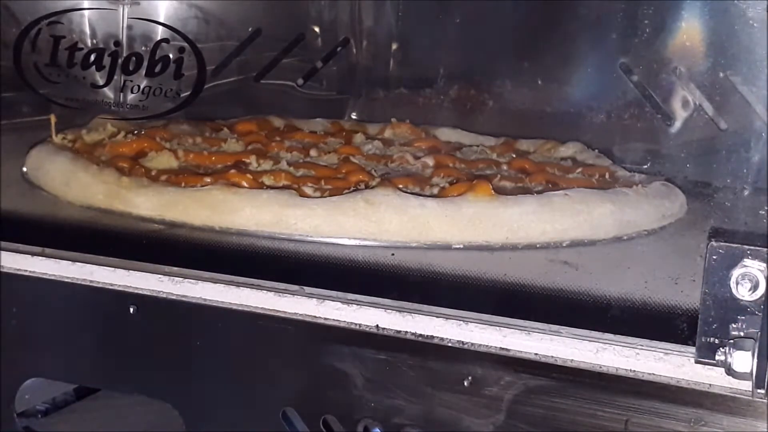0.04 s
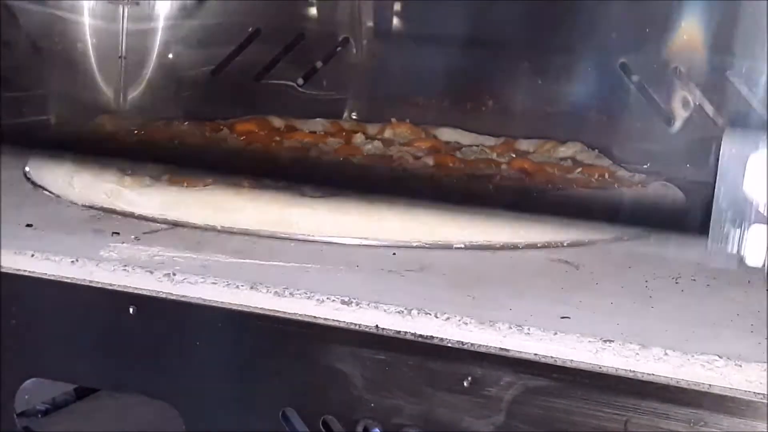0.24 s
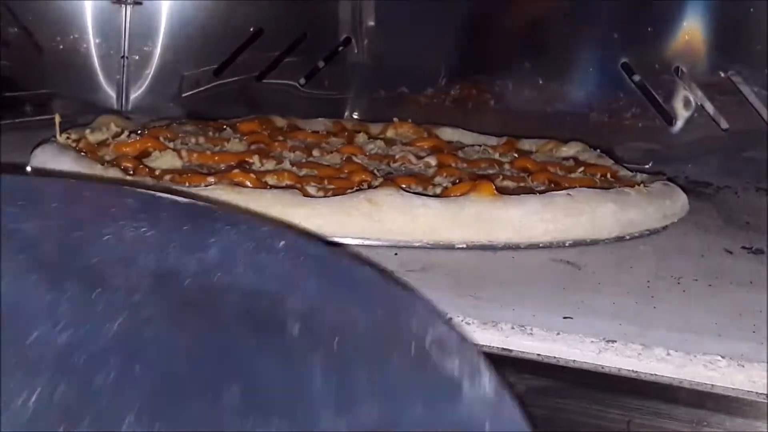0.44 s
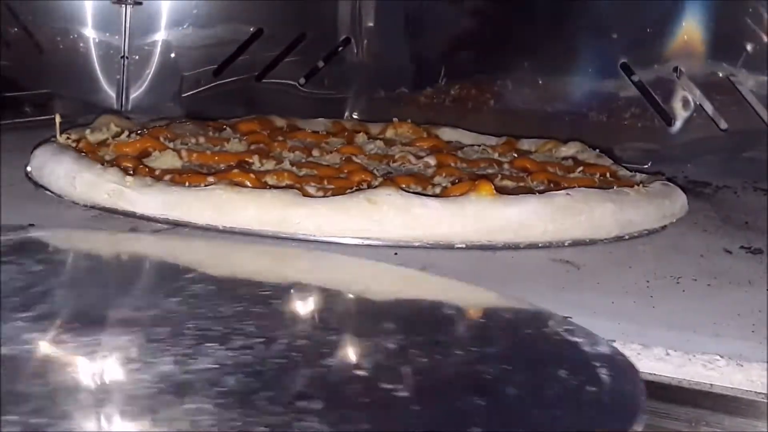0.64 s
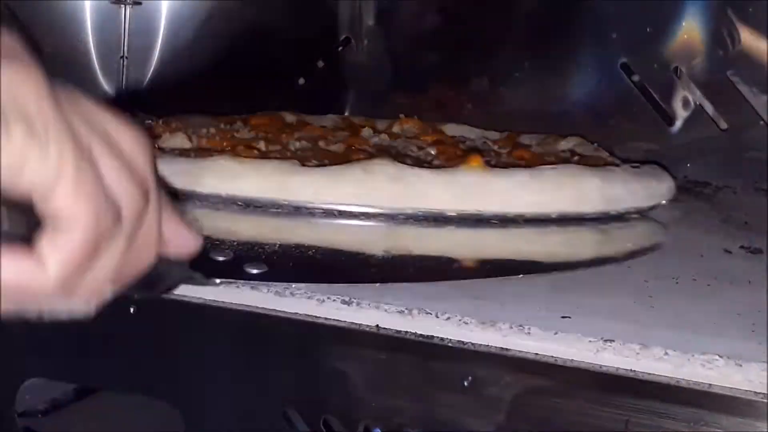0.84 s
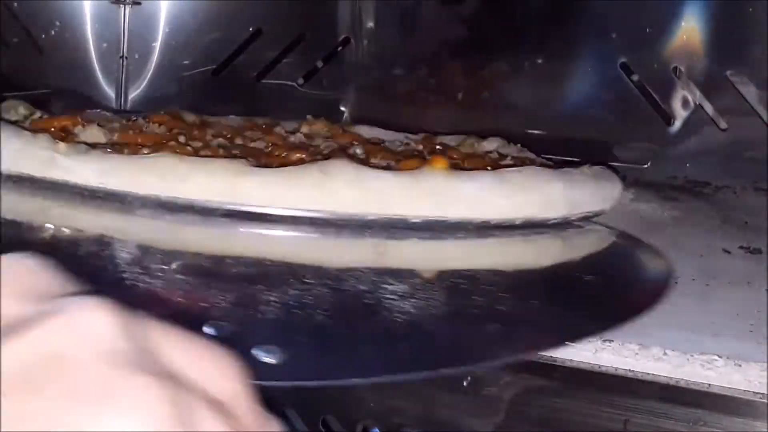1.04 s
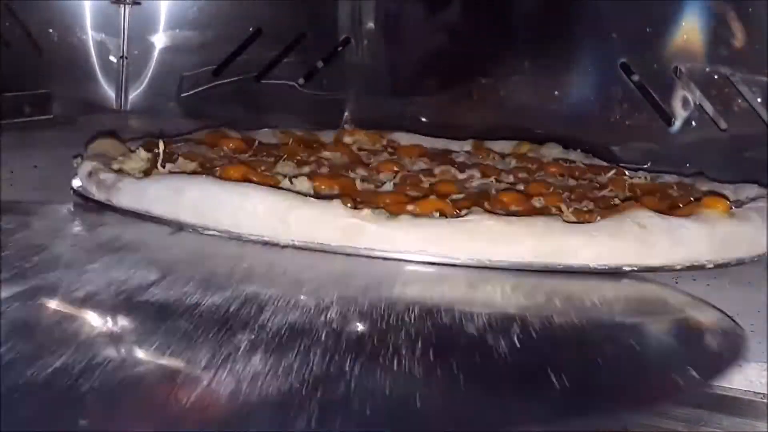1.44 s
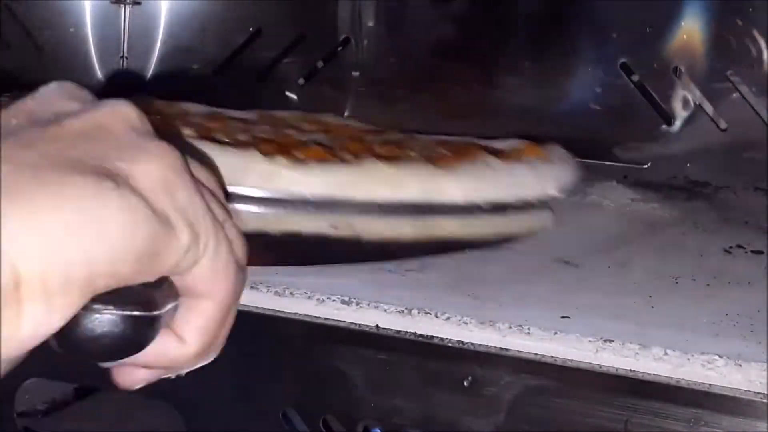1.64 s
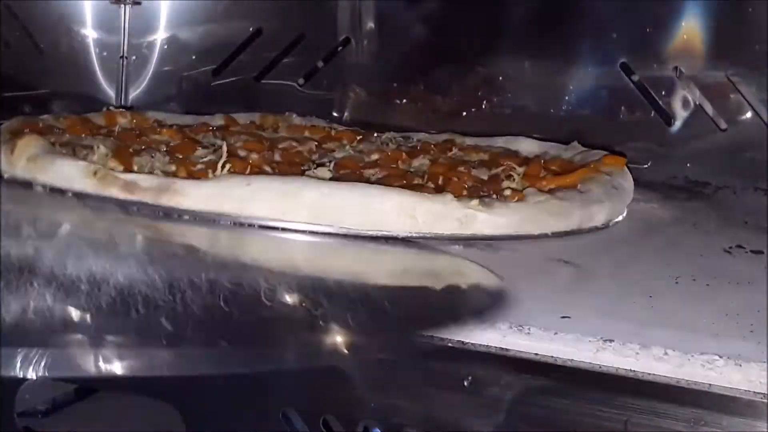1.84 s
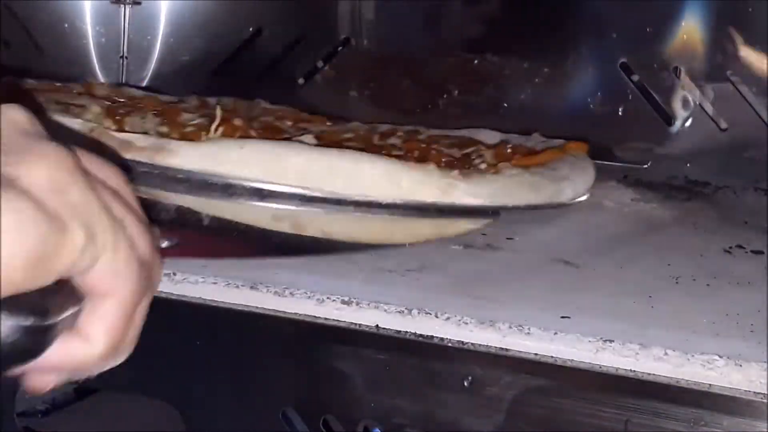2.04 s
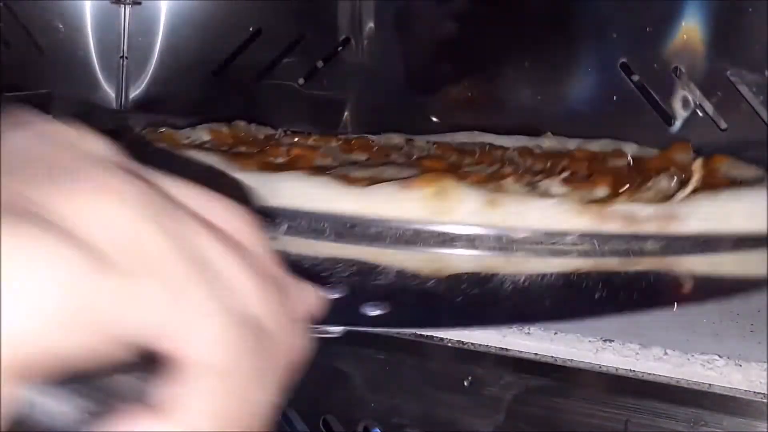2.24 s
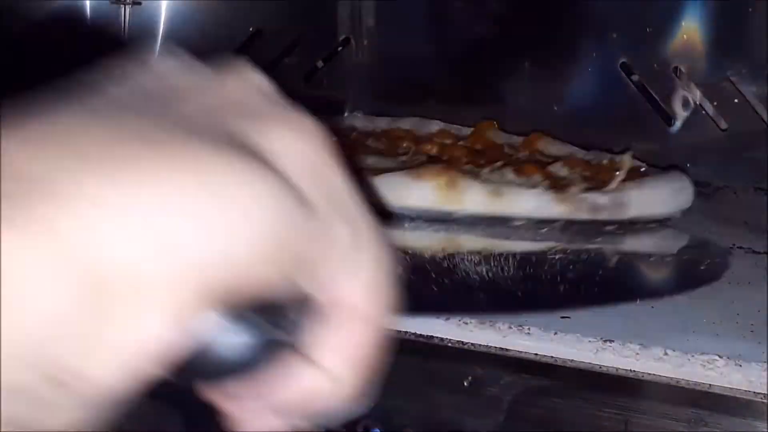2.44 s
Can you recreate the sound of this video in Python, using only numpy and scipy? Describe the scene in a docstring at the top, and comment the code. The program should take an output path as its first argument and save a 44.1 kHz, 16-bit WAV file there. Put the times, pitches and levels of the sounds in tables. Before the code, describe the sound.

Metal scraping and clanking as an oven door opens and a pizza peel slides over stone.

```python
"""At a gas pizza oven, the steel door grinds open on its hinge and clanks against its stop.
A metal peel slides in under the pizza, turns it in short scraping strokes over the stone floor
and knocks down on the stone. Impacts excite the modes of the sheet metal; stick-slip friction
makes it scrape and squeak. Everything reverberates in the steel oven chamber,
over the soft hiss of the burner."""
import sys
import numpy as np
from scipy import signal
from scipy.fft import rfft, irfft
from scipy.io import wavfile

SR = 44100
rng = np.random.default_rng(int(sys.argv[2]) if len(sys.argv) > 2 else 0)


def wav_record(signal):
    """Record a signal, one row per channel, as 16-bit PCM in the file named by sys.argv[1]."""
    frames = np.transpose(np.atleast_2d(signal))
    bounded = np.clip(frames, -1, 1)
    # unit amplitude maps onto the largest positive 16-bit level
    quanta = np.round(bounded * 32767).astype(np.int16)
    wavfile.write(sys.argv[1], SR, quanta)


N = 110250
T = np.arange(N) / SR


def door():
    """Friction and impact excite a steel plate: the door grinds on its hinge and clanks."""
    # clanks: t/s, attack/s, t60/s, bass, middle, treble and ring level/dB, f/Hz that rings most
    clanks = [(.074, 0.0098, 0.12, -79, -61, -48.5, -59.5, 2000),
              (.201, 0.00086, 0.15, -40, -53, -54, -45, 2000),
              (.227, 0.00047, 0.17, -40.5, -35, -26, -38.5, 1550),
              (.243, 0.0014, 0.24, -36, -32.5, -34, -41, 1220),
              (.277, 0.0013, 0.3, -41, -41.5, -54, -50, 1700),
              (.399, 0.0042, 0.17, -33.5, -39, -32, -28, 1150),
              (.403, 0.00041, 0.029, -34, -49, -26, -30.5, 4850),
              (.410, 0.00082, 0.23, -43, -38, -51, -24.5, 607),
              (.556, 0.0034, 0.12, -36, -39.5, -31.5, -34, 1045),
              (.568, .002, .08, -33, -66, -41.5, -27, 980), (.591, 0.00073, 0.17, -43, -40, -33, -50, 980),
              (.617, 0.0017, 0.12, -35.5, -55, -32.5, -56, 1900)]
    # hinge rubs: t/s, rise/s, hold/s, release t60/s, body level/dB, hiss level/dB, brightness/dB
    rubs = [(.09, 0.028, 0.17, .2, -61.5, -69, 10), (.25, 0.015, 0.076, 0.22, -41, -48, -1),
            (.35, 0.015, 0.095, 0.068, -66, -50.5, -11), (.615, 0.014, .066, 0.19, -42.5, -44.5, 8)]
    # modes of the door: f/Hz, level/dB, t60/s
    modes = [(524.7, -12, 0.15), (629.6, 3.5, 0.14), (820, -16, 0.13), (1050, 1.5, 0.1), (1143, -21, .22),
             (1550, -0.5, 0.2), (1826, 1, 0.33), (2010, 1, 0.16), (2690, 1, 0.17), (3380, -0.5, 0.17),
             (4440, 1.5, 0.082), (4750, -17, 0.093), (6030, 2, 0.088)]
    slips = friction(slips_per_s=390, size_db=1, smooth=0.63)
    rub = rubbing(rubs, slips, modes, modes_db=-11, mode_width_hz=18,
                  edge_db=-14, judder_db=1.2, uneven_db=5.5)
    return low_cut(rub * grit()) + impacts(clanks, modes, uneven_db=6.5)


def peel():
    """Sliding friction and impact excite a thin blade: the peel scrapes and knocks on the stone."""
    # knocks: t/s, attack/s, t60/s, bass, middle, treble and ring level/dB, f/Hz that rings most
    knocks = [(1.408, .002, 0.087, -59, -48, -54, -42, 1500),
              (1.681, 0.0048, 0.16, -54, -44, -36, -33.5, 1030),
              (1.797, 0.00042, 0.14, -32.5, -26.5, -20, -23.5, 584),
              (1.806, 0.0036, 0.11, -27, -29.5, -34, -27.5, 1150),
              (1.821, .003, 0.078, -48, -42, -48, -32, 1890),
              (2.223, 0.004, 0.13, -49, -45.5, -43, -42, 1150),
              (2.348, .004, 0.068, -47, -42.5, -50.5, -52, 2300)]
    # slides: t/s, rise/s, hold/s, release t60/s, body level/dB, hiss level/dB, brightness/dB
    slides = [(.787, .021, 0.021, 0.14, -38, -23.5, 1), (.845, 0.013, 0.024, 0.21, -40, -46.5, -10),
              (.96, 0.034, 0.06, 0.6, -61, -61, 4), (1.06, 0.061, 0.0023, 0.069, -54, -42.5, -1.5),
              (1.135, 0.033, .04, 0.067, -46.5, -46.5, 3), (1.205, 0.026, 0.032, 0.17, -41, -30, -5.5),
              (1.31, 0.11, 0.14, 0.12, -50, -47.5, 1), (1.486, 0.021, 0.0098, 0.11, -39, -29.5, -8.5),
              (1.521, 0.011, 0.013, 0.033, -49, -32, -1.5), (1.69, 0.015, 0.069, 0.14, -50, -45.5, 2),
              (1.835, .025, 0.014, 0.05, -34, -35.5, -6), (1.874, 0.025, 0.049, 0.08, -39, -25, -1),
              (2.0, .02, 0.34, 0.46, -56, -54, 2), (2.08, 0.016, 0.038, 0.079, -64, -55.5, -9),
              (2.264, 0.013, 0.0027, 0.085, -43, -31.5, -3.5), (2.3, 0.098, 0.049, 0.38, -46, -81, -11)]
    # modes of the peel: f/Hz, level/dB, t60/s
    modes = [(460, -13.5, 0.78), (687, -8.5, 0.21), (900, -19, .15), (1026, 3, 0.13), (1185, -7.5, .3),
             (1244, -10, 0.43), (1634, -5, 0.23), (1863, -3, .25), (2055, 0, 0.29), (2280, -16, 0.11),
             (2910, 0, 0.084)]
    slips = friction(slips_per_s=2000, size_db=3.5, smooth=0.73)
    scrape = rubbing(slides, slips, modes, modes_db=-9.5, mode_width_hz=22,
                     edge_db=-13.5, judder_db=1.5, uneven_db=2.5)
    return scrape + impacts(knocks, modes, uneven_db=4)


def impacts(blows, modes, uneven_db, crack_db=-10.5, crack_t60=0.017):
    """Free vibration: a blow sets off a crash of dense modes, and clear ones chosen by where it lands."""
    # spectrum of struck sheet metal: f/Hz, level/dB
    clank_colour = [(60, -54), (200, -60.5), (400, -14), (620, 3), (1100, 5.5), (2200, -5), (4000, -6),
                    (8000, -9.5), (16000, -13)]
    out = np.zeros(N)
    for start, attack, t60, *levels, _, _ in blows:
        sheet = dense_modes(coloured(rng.standard_normal(N), clank_colour), uneven_db)
        bands = [from_db(db) * rms_one(register(sheet, k)) for k, db in enumerate(levels)]
        crack = from_db(crack_db) * bands[2] * decay(attack, crack_t60)   # sudden blows crack most
        out += sum(bands) * stroke(start, attack, 0, t60) + crack * stroke(start, attack, 0, crack_t60)
    starts, *_, ring_db, centre_hz = np.transpose(blows)
    for hz, db, t60 in modes:
        off_pitch_db = 29 * np.abs(np.log2(hz / centre_hz))   # 29 dB per octave
        scatter_db = 4.5 * rng.standard_normal(len(starts))
        impulses = np.zeros(N) + 1e-18
        impulses[(starts * SR).astype(int)] = from_db(ring_db + db - off_pitch_db + scatter_db)
        r, w = decay(1 / SR, t60), 2 * np.pi * hz / SR
        out += signal.lfilter([1, -1], [1, -2 * r * np.cos(w), r * r], impulses)
    return out


def rubbing(pushes, slips, modes, modes_db, mode_width_hz, edge_db, judder_db, uneven_db):
    """Forced vibration: under friction the body rings low while the thin edge hisses and sings."""
    # resonances of the thin edge: f/Hz, bandwidth/Hz, level/dB
    edge_modes = [(4075, 79, -2.5), (4200, 28, 1), (5166, 17, 7), (5450, 23, -3), (5760, 19, -8.5),
                  (6150, 10, -10.5), (7800, 150, 5.5), (8740, 190, 6), (10900, 55, -20.5)]
    # spectra of the rubbed body and of the hiss: f/Hz, level/dB
    body_colour = [(60, -4), (170, -42), (400, -15), (650, 0.5), (1050, 5.5), (1500, 2.5), (2200, 1),
                   (3200, -7), (6000, -15)]
    hiss_colour = [(900, -44), (2000, -14.5), (3000, -11), (4000, 0.5), (6000, 0.5), (8000, -5.5),
                   (11000, -3), (16000, -9.5)]
    rings = rms_one(sum(from_db(db) * resonate(slips, hz, mode_width_hz) for hz, db, _ in modes))
    edge = rms_one(sum(from_db(db) * resonate(slips, hz, width) for hz, width, db in edge_modes))
    body = rms_one(coloured(slips, body_colour) + from_db(modes_db) * rings)
    hiss = rms_one(coloured(slips, hiss_colour) + from_db(edge_db) * edge)
    out = np.zeros(N)
    for *shape, body_db, hiss_db, bright_db in pushes:
        tilted_hiss = coloured(hiss, [(4000, 0), (12000, bright_db)])
        rub = from_db(body_db) * body + from_db(hiss_db) * tilted_hiss
        out += np.std(rub) * dense_modes(rub, uneven_db) * stroke(*shape)
    return low_cut(out * from_db(judder_db * drift(per_s=130)))


def friction(slips_per_s, size_db, smooth, sheet_t60=0.033):
    """Stick-slip: tiny uneven slips, spread out in time by the sheet, over a smooth rubbing noise."""
    sizes = from_db(size_db * np.minimum(rng.exponential(1, N), 4)) * rng.choice([-1, 1], N)
    spread = rng.standard_normal(SR // 16) * decay(T[:SR // 16], sheet_t60)
    slipping = rng.random(N) < slips_per_s / SR
    slips = signal.fftconvolve(sizes * slipping, spread)[:N]
    return rms_one(rms_one(slips) + smooth * rng.standard_normal(N))


def dense_modes(x, uneven_db, spacing_hz=45.27):
    """Modal coupling: each point of contact favours its own set of the sheet's many modes; rms 1."""
    mode_number = np.arange(N // 2 + 1) * SR / N / spacing_hz
    strengths = np.clip(rng.standard_normal(4000), -2, 2)
    gain = from_db(uneven_db * np.interp(mode_number, np.arange(len(strengths)), strengths))
    return rms_one(irfft(rfft(x) * gain, N))


def grit(ticks_per_s=70, t60=0.02, surge_db=7.5):
    """Amplitude modulation: grit in the hinge makes the friction surge briefly; rms 1."""
    ticks = (rng.random(N) < ticks_per_s / SR) * rng.random(N)
    surge_power = signal.lfilter([1], [1, -decay(1 / SR, t60) ** 2], ticks + 1e-18)
    return rms_one(np.sqrt(1 + from_db(surge_db) ** 2 * surge_power))


def squeaks(waver=0.0202):
    """Self-excited oscillation: short wavering tones where steel sticks and slips."""
    # squeaks: t/s, rise/s, hold/s, release t60/s, f/Hz, level/dB
    tones = [(0.01, .008, 0.015, 0.072, 1174, -61), (0.025, 0.0057, .015, 0.056, 2044, -61),
             (.14, 0.0092, 0.018, .06, 1760, -69), (0.198, 0.0044, 0.007, 0.089, 2170, -46.5),
             (0.424, 0.0038, 0.017, .08, 13400, -42.5), (1.031, 0.0066, 0.0088, .08, 1306, -51),
             (1.487, 0.015, 0.022, 0.085, 1019, -40.5), (1.628, 0.0028, 0.0027, 0.037, 1900, -47.5),
             (1.87, .01, 0.017, .1, 6165, -32), (2.391, 0.0077, 0.018, 0.2, 2108, -50),
             (2.412, 0.0065, 0.024, 0.091, 2970, -48), (2.442, .008, 0.022, 0.12, 680, -51.5)]
    out = np.zeros(N)
    for *shape, hz, db in tones:
        pitch = hz * (1 + waver * drift(per_s=780))
        phase = 2 * np.pi * np.cumsum(pitch) / SR
        out += from_db(db) * stroke(*shape) * np.sqrt(2) * np.sin(phase)
    return out


def chamber(x):
    """Reverberation: dense reflections between steel walls, fainter but longer in the treble."""
    # reverberation in bass, middle and treble: t60/s, then level/dB
    decay_times = (0.35, 0.34, 0.63)
    levels = (-5.5, -8, -22.5)
    age, response = T[:SR // 2], 0
    for k, (t60, db) in enumerate(zip(decay_times, levels)):
        tail = rng.standard_normal(len(age)) * decay(age, t60)
        response += from_db(db) * register(tail / np.linalg.norm(tail), k)
    return signal.fftconvolve(x, response)[:N]


def burner():
    """Broadband noise: the soft, steady hiss of the gas burner."""
    # spectrum of the burner: f/Hz, level/dB
    colour = [(30, -38), (130, -22), (200, -8), (320, -1), (420, -5), (1100, -0.5), (3000, -9),
              (5000, -6.5), (11000, -10), (16000, -16)]
    return from_db(-61.5) * coloured(rng.standard_normal(N), colour)


def resonate(x, hz, width_hz):
    """Steady response of one damped resonator; rms 1."""
    r = np.exp(-np.pi * width_hz / SR)
    return rms_one(signal.lfilter([1, 0, -1], [1, -2 * r * np.cos(2 * np.pi * hz / SR), r * r], x))


def coloured(x, colour):
    """Spectral shaping by a curve of (f/Hz, level/dB) points; rms 1."""
    hz, db = np.transpose(colour)
    bins = np.maximum(np.arange(N // 2 + 1) * SR / N, 1)
    gain = from_db(np.interp(np.log(bins), np.log(hz), db))
    return rms_one(irfft(rfft(x) * gain, N))


def register(x, index):
    """Band filtering: keep the bass (0), the middle (1) or the treble (2)."""
    # edges of the middle band: f/Hz
    low, high = (1576, 3240)
    edge, kind = [(low, "low"), ([low, high], "band"), (high, "high")][index]
    return signal.sosfilt(signal.butter(4, edge, kind, fs=SR, output="sos"), x)


def low_cut(x, hz=300):
    """High-pass filtering takes out the rumble."""
    return signal.sosfilt(signal.butter(2, hz, "high", fs=SR, output="sos"), x)


def stroke(start, rise, hold, release):
    """Envelope of a push: it builds, holds and decays exponentially."""
    onset = np.sin(np.pi / 2 * np.clip((T - start) / rise, 0, 1)) ** 2
    return onset * decay(T - start - rise - hold, release)


def decay(age, t60):
    """Exponential damping from age 0: 60 dB in t60 seconds."""
    return np.exp(-np.log(1000) * np.maximum(age, 0) / t60)


def drift(per_s):
    """Random fluctuation: straight lines between standard normal values."""
    knots = np.arange(0, N / SR + 1, 1 / per_s)
    return np.interp(T, knots, rng.standard_normal(N)[:len(knots)])


def from_db(db):
    """Level to amplitude ratio."""
    return 10 ** (np.asarray(db) / 20)


def rms_one(x):
    """Normalisation to rms 1."""
    return x / np.sqrt(np.mean(x ** 2) + 1e-20)


def scene():
    """Superposition: the direct and the reverberant sound of the metal, over the burner."""
    metal = door() + peel() + squeaks()
    hiss = burner()
    return (from_db(-3.5) * (metal + chamber(metal)) + hiss)[None]


def record(dry, cutoff_hz=16000, offset=-0.0006):
    """Band limiting: a steep low-pass, plus a slight constant offset."""
    return signal.sosfilt(signal.ellip(12, .1, 80, cutoff_hz, fs=SR, output="sos"), dry) + offset


dry = scene()
out = record(dry)
wav_record(out)
```